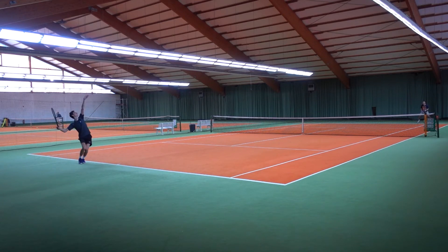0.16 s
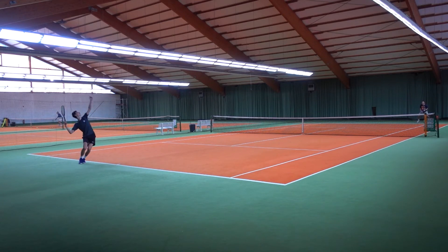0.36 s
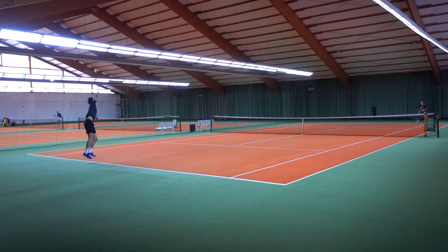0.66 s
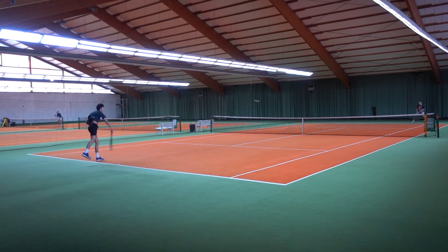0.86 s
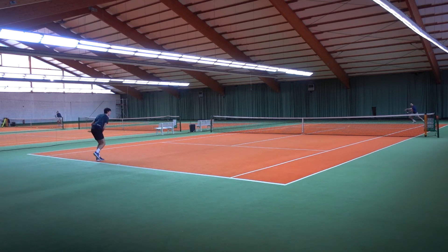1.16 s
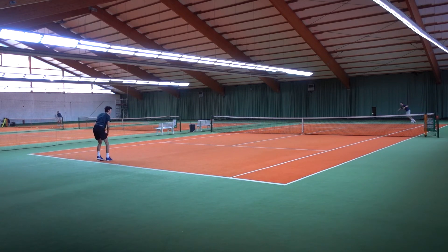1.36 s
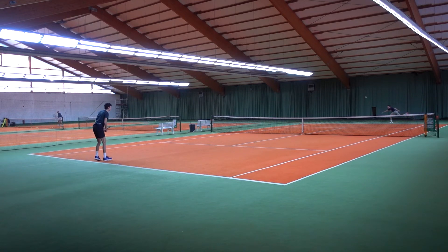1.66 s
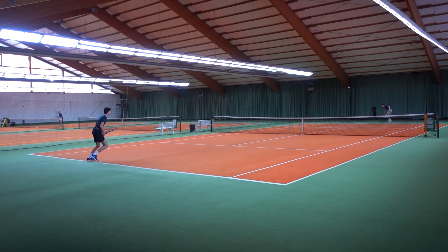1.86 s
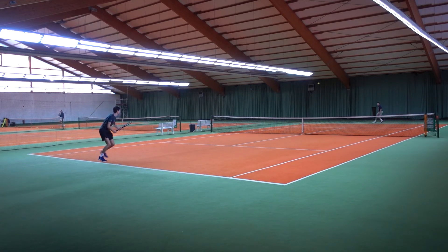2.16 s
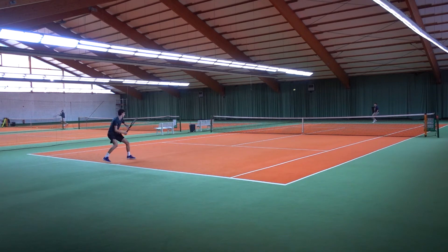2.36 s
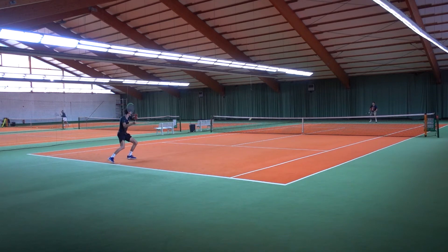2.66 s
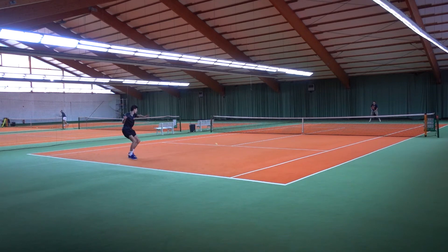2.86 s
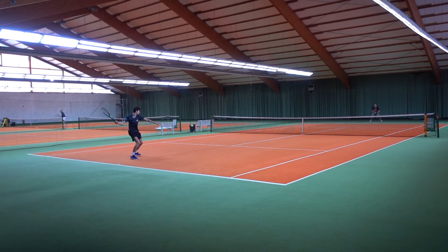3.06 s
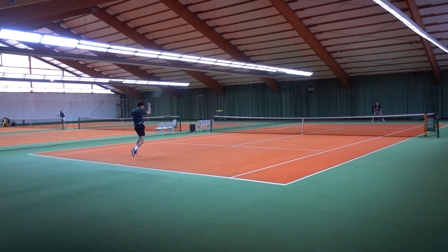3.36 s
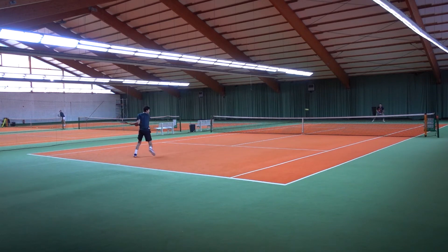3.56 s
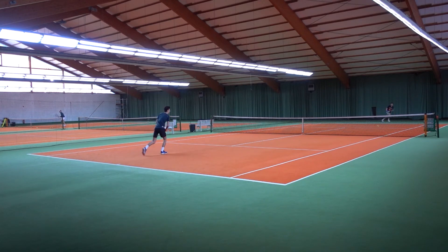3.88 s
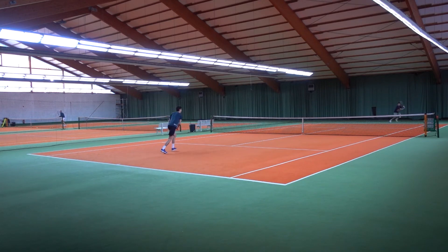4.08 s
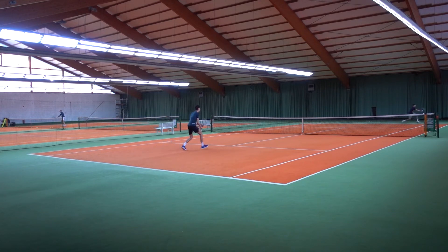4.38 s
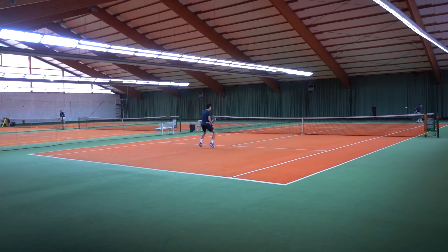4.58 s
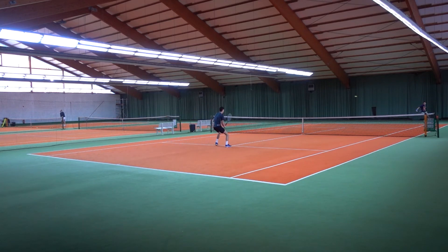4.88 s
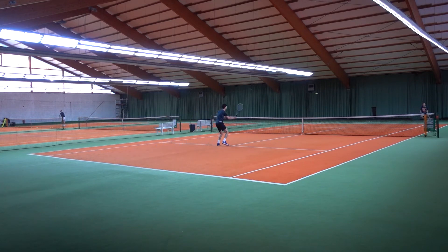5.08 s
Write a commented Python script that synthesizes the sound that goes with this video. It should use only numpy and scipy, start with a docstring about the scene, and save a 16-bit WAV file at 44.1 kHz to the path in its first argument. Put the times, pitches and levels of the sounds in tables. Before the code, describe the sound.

From the corner of an indoor tennis court, five racket hits crack with a hollow pop and a long echo off the roof and walls. The near serve comes first, then two distant smacks close together, another near stroke and a far answer. Footsteps thud, soles scuff and squeak, and the ball knocks on the floor in the gaps, with faint, steady air noise underneath.

```python
"""Indoor tennis rally

Heard from a corner of the court in a large hall. Racket strokes pop, scatter off floor and walls,
swell back from the wooden roof and die away slowly. Shoes and ball thud on the court,
rubber soles scuff and squeak, and the hall keeps up a faint hush."""
import sys
import numpy as np
from scipy import signal
from scipy.fft import rfft, irfft, next_fast_len
from scipy.io import wavfile

SR = 44100
rng = np.random.default_rng(int(sys.argv[2]) if len(sys.argv) > 2 else 0)


def generate_wav(sig):
    """Save sig (samples, or channels by samples) to the path in sys.argv[1] as 16-bit PCM at SR."""
    pcm = np.round(np.clip(np.atleast_2d(sig).T, -1, 1) * 32767).astype(np.int16)
    wavfile.write(sys.argv[1], SR, pcm)


N = 230363
SPAN = 2 * SR  # impulse response length
T = np.arange(SPAN) / SR
FREQS = np.fft.rfftfreq(SPAN, 1 / SR)


def undb(db):
    """Decibels to gain."""
    return 10 ** (np.asarray(db) / 20)


def unit(x):
    """Scale to unit mean energy per channel."""
    return x / np.sqrt(np.mean(np.sum(x ** 2, axis=-1)))


def fade(t60_s):
    """Exponential decay, 60 dB in t60_s."""
    return np.exp(-np.log(1000) * T / t60_s)


def curve(points, f_hz=FREQS):
    """Interpolate (f/Hz, value) points over log frequency."""
    hz, value = np.transpose(points)
    return np.interp(np.log(f_hz + 1), np.log(hz), value)


def resonance(hz, width_hz):
    """Broad band-pass resonance, in dB."""
    f = FREQS + 1
    return -10 * np.log10(1 + ((f * f - hz * hz) / (f * width_hz)) ** 2)


def peak(hz, width_hz, height_db):
    """Narrow peak on a flat spectrum, in dB."""
    return height_db / (1 + (2 * (FREQS - hz) / width_hz) ** 2)


def strike(spectrum_db):
    """Minimum-phase click of unit energy with the given spectral shape."""
    cepstrum = irfft(np.log(undb(spectrum_db)))
    fold = 1 + np.sign(SPAN // 2 - np.arange(SPAN))
    fold[0] = 1
    return unit(irfft(np.exp(rfft(cepstrum * fold)))[:SR // 10])


def thump(hz, swell_s):
    """Soft contact: a few cycles swell and die; the air carries their rate of change."""
    t = T[:SR // 10]
    envelope = (t / swell_s) ** 2 * np.exp(-2 * t / swell_s)
    return unit(np.gradient(envelope * np.sin(2 * np.pi * hz * t)))


def through(x, response):
    """Convolve x with a path's impulse response."""
    return signal.fftconvolve(np.atleast_2d(x), np.atleast_2d(response), axes=-1)


def add(out, t_s, x):
    """Mix x into out from t_s on."""
    start = max(int(t_s * SR), 0)
    out[:, start:start + x.shape[-1]] += x[..., :N - start]


def diffuse(size=SPAN):
    """Noise from all directions: left and right alike in the bass, unrelated in the treble."""
    # stereo width: f/Hz, side over mid/dB
    width = [(60, -6), (190, -26.5), (340, -20), (620, -12.5), (1100, -6.5), (2000, -10.5), (3500, -1),
             (6300, 4), (11000, -3.5)]
    side_gain = undb(curve(width, np.fft.rfftfreq(size, 1 / SR)))
    mid, side = rfft(rng.standard_normal((2, size)))
    left_right = np.array([mid + side_gain * side, mid - side_gain * side])
    return irfft(left_right / np.sqrt(1 + side_gain ** 2), size)


def scatter(build_s, t60_s, patchy_db=1.0):
    """Uneven reflections from the floor and nearby surfaces."""
    size, clump_samples = SR // 3, 49
    clumps = np.repeat(rng.standard_normal(size // clump_samples), clump_samples)
    envelope = ((1 - np.exp(-T / build_s)) * fade(t60_s))[:size]
    return unit(diffuse(size) * envelope * undb(patchy_db * clumps))


def hall(build_s=0.0024, roof_delay_s=0.19, roof_log_spread=0.45):
    """Two responses: the hall's long tail and the broad swell off the sloping roof."""
    # octave bands: f/Hz, t60/s, tail/dB, roof swell/dB
    bands = [(72, 1.7, -21, -6), (140, 2.05, -6, -7.5), (276, 2.1, -5, -16), (513, 2.06, -2.5, -10.5),
             (1100, 1.66, -2, -3), (2000, 1.59, -6.5, -9), (4130, 0.88, -0.5, -13), (7800, 0.58, -1, -20)]
    walls, ceiling = rfft(diffuse()), rfft(diffuse())
    log_time = np.log((T + 1 / SR) / roof_delay_s)
    swell = unit(np.exp(-0.5 * (log_time / roof_log_spread) ** 2))
    build = (1 - np.exp(-T / build_s)) / np.linalg.norm(fade(1.46))
    centres_hz = [band[0] for band in bands]
    tail = roof = 0
    for share, (_, t60_s, tail_db, roof_db) in zip(np.eye(len(bands)), bands):
        octave = curve(np.column_stack([centres_hz, share]))
        tail = tail + irfft(walls * octave) * undb(tail_db) * build * fade(t60_s)
        roof = roof + irfft(ceiling * octave) * undb(roof_db) * swell
    return tail, roof


def in_hall(near, sent, roof_db=-12):
    """Near sound at floor level plus the hall's response to sent."""
    tail, roof = hall()
    return near + through(sent, tail + undb(roof_db) * roof)[:, :N]


def hush(level_db=-56.5):
    """Steady faint air noise of the hall."""
    # spectral shape: f/Hz, level/dB
    spectrum = [(30, -36), (70, -39), (130, -19.5), (250, -9), (380, 3), (550, -8), (1000, -6),
                (2200, -12.5), (3500, -22.5), (6000, -23), (11000, -30)]
    size = next_fast_len(N, real=True) * 2
    gain = undb(curve(spectrum, np.fft.rfftfreq(size, 1 / SR)))
    air = irfft(rfft(diffuse(size)) * gain)[:, :N]
    return undb(level_db) * air / air.std()


def knocks_and_swells():
    """Near ball knocks; dull, blurred swells in the hall, after thuds or from distant bounces."""
    near_hits = [(2.9047, -11, 0.045), (2.915, -13, 0.089)]  # ball skidding close by: t/s, level/dB, t60/s
    swells = [(0.0, -14.5), (0.50, -0.5), (1.225, -5.5), (2.61, -15.5), (3.78, -1), (4.05, -13),
              (4.449, -7.5)]  # dull swells in the hall: t/s, level/dB
    # hollow near knock and dull swell: f/Hz, level/dB
    knock_spectrum = [(60, -30), (160, -8.5), (330, 7.5), (700, -5), (1250, 2.5), (1700, -27), (2800, -15),
                      (4200, -34), (11000, -48)]
    swell_spectrum = [(60, -11), (150, 2.5), (350, 10), (1000, 13), (2200, 3.5), (4000, -8.5), (11000, -67)]
    near, sent = np.zeros((2, N)), np.zeros((1, N))
    knock, dull_click = strike(curve(knock_spectrum)), strike(curve(swell_spectrum))
    for t_s, db, t60_s in near_hits:
        add(near, t_s, undb(db) * through(knock, scatter(0.0008, t60_s)))
    for t_s, db in swells:
        blur = scatter(build_s=0.0056, t60_s=0.16)[0]
        add(sent, t_s, undb(db) * through(dull_click, blur))
    return in_hall(near, sent)


def scuffs(rasp_width_hz=1300, squeak_width_hz=70, dull_hz=3600, hall_db=1.5):
    """Rubber sticks and slips: a grip squeaks low and clear, a slide is higher and mostly rasp."""
    # sole rubs: t/s, level/dB, f/Hz, t60/s
    rubs = [(0.442, -12, 1823, 0.035), (.503, -6.5, 1816, 0.054), (.537, -10.5, 2380, 0.053),
            (1.270, -17.5, 2005, 0.33), (2.316, -7.5, 2081, 0.29), (3.645, -14, 2170, .024),
            (3.675, -16, 2340, 0.042), (4.547, -14, 2460, .12), (5.102, -17.5, 2990, 0.037),
            (5.139, -20.5, 2760, 0.12), (5.201, -14.5, 2840, 0.098)]
    near, sent = np.zeros((2, N)), np.zeros((1, N))
    rolloff_db = 20 * np.log10(1 + (FREQS / dull_hz) ** 2)
    for t_s, db, hz, t60_s in rubs + shuffle():
        squeak_db = max(18 - 14 * np.log2(hz / 1910), 0)  # -14 dB per octave
        spectrum_db = resonance(hz, rasp_width_hz) + peak(hz, squeak_width_hz, squeak_db) - rolloff_db
        rub = undb(db) * strike(spectrum_db)
        add(near, t_s, through(rub, scatter(0.024 * t60_s, t60_s)))  # long slides start softly
        add(sent, t_s, undb(hall_db) * rub)
    return in_hall(near, sent)


def shuffle(rate_per_s=16, centre_hz=2740, spread_octaves=0.12, t60_s=0.12):
    """Quick footwork between shots: scuff rows at uneven times and pitches."""
    # bursts: t/s, length/s, level per rub/dB
    bursts = [(3.781, .12, -20.5), (4.754, .14, -21)]
    rubs = []
    for start_s, length_s, db in bursts:
        for t_s in np.arange(start_s, start_s + length_s, 1 / rate_per_s):
            hz = centre_hz * 2 ** (spread_octaves * rng.standard_normal())
            jitter_s = 0.5 * rng.random() / rate_per_s
            rubs.append((t_s + jitter_s, db, hz, t60_s))
    return rubs


def landings(shoe_below_hz=480, grit_db=-26, floor_db=-8, thud_hall_db=-1, slap_hall_db=4.5):
    """Shoes and ball thud, slap and knock the floor; the deep thuds are shoes and crunch grit."""
    # impacts: t/s, thud/dB, thud f/Hz, slap/dB
    impacts = [ (0.4426, -11.5, 310, -11), (.4900, -18, 390, -14.5), (1.5450, -2, 400, -15),
               (2.2636, -11.5, 258, -5.5), (2.3816, -2, 290, -4), (2.3890, -0.5, 662, -26),
               (3.7127, -5.5, 348, -14), (4.4510, -19.5, 715, -34), (4.4867, -10, 276, -2.5),
               (4.5288, -2, 665, -34), (4.5365, -1.5, 530, -11), (5.1026, -7, 350, -15.5),
               (5.1590, -13.5, 332, -16.5)]
    # sole slap, grit underfoot, dull floor knock: f/Hz, level/dB
    slap_spectrum = [(40, -20), (100, -8.5), (220, -11), (500, 6.5), (1000, 10), (1900, 11), (2700, 5),
                     (4000, -6.5), (7000, -17), (11000, -34)]
    grit_spectrum = [(1000, -52), (2600, -11), (3600, 6.5), (5000, -2), (7000, -4.5), (11000, -21)]
    floor_spectrum = [(40, 4), (100, -30), (190, 3.5), (350, 7.5), (700, -13.5), (1400, -11.5), (4000, -49)]
    near, sent = np.zeros((2, N)), np.zeros((1, N))
    sole, grit, floor = (strike(curve(s)) for s in (slap_spectrum, grit_spectrum, floor_spectrum))
    for t_s, thud_db, hz, slap_db in impacts:
        thud = undb(thud_db) * thump(hz, swell_s=0.0024)
        slap = undb(slap_db) * sole + (hz < shoe_below_hz) * undb(grit_db) * grit
        boom = undb(thud_db + floor_db) * floor
        add(near, t_s, thud)
        add(near, t_s, through(slap, scatter(build_s=0.00068, t60_s=0.041)))
        add(near, t_s, through(boom, scatter(build_s=0.0021, t60_s=0.061)))
        add(sent, t_s, undb(thud_hall_db) * (thud + boom) + undb(slap_hall_db) * slap)
    return in_hall(near, sent)


def swishes(width_hz=1500):
    """Air rushes through the strings, growing until the ball is met."""
    # swings: contact t/s, level/dB, f/Hz, swell/s
    swings = [(0.743, -10.5, 1500, 0.023), (3.352, -19.5, 2240, 0.026)]
    out, size = np.zeros((2, N)), SR // 6
    for contact_s, db, hz, swell_s in swings:
        rush = unit(diffuse(size) * np.exp(-T[:size][::-1] / swell_s))
        add(out, contact_s - size / SR, undb(db) * through(strike(resonance(hz, width_hz)), rush))
    return out


def strokes(crack_db=-10, thump_db=-10.5, snap_db=-2, roof_db=2, body_hall_db=-5):
    """Ball on strings: a crack, a hollow thump and a short ring, direct and reflected."""
    # hits: t/s, level/dB, distance/m, clear path/dB, hall/dB, thump f/Hz, ring/dB
    hits = [ (0.7408, 9, 11.2, 2.5, 4.5, 321, -14), (1.5925, 9.5, 32, -0.5, 7, 470, -17.5),
            (1.8870, 13, 29, -14, -2, 820, -7), (3.352, 7.5, 12.8, 0.5, 2.5, 347, -10.5),
            (4.5754, 6.5, 27, -16, 2, 1080, -9.5)]
    # stroke spectra, set by where the ball meets the strings: f/Hz, level/dB
    serve = [(41, -53), (70, -55), (265, -8), (308, -5.5), (342, -3), (405, 0.5), (523, -1.5), (718, -7),
             (945, -3), (1270, -2), (1540, -10.5), (2070, -1.5), (2720, -13), (5830, -23), (11000, -34.5),
             (14300, -59), (22000, -120)]
    serve_return = [(41, -105), (70, -36), (163, -18), (350, -6), (380, -6.5), (569, -1.5), (765, -7),
                    (868, -6), (1380, -14), (1470, -10.5), (2160, -7), (3740, -20.5), (4430, -25),
                    (9290, -38), (11000, -48), (14300, -90), (22000, -120)]
    smack = [(70, -79), (130, -28), (220, -10.5), (500, -16), (700, -16.5), (815, 9), (930, -17.5),
             (1200, -0.5), (1470, 2.5), (1700, 2), (2900, 1.5), (3600, -11), (6000, -26.5), (11000, -44)]
    forehand = [(70, -42), (130, -27.5), (230, -11), (360, -3), (520, 1.5), (760, -2), (1100, -3.5),
                (1500, -13), (2130, -5), (3000, -15), (4800, -18), (5800, -27), (7300, -27), (11000, -32.5)]
    reply = [(41, -78), (70, -28.5), (357, -2), (470, -4), (512, -11), (906, 2.5), (1170, -3.5),
             (1300, -3.5), (1470, -3), (1670, -11.5), (1860, -5.5), (2300, -8), (2610, -2), (4160, -19.5),
             (11000, -37), (14300, -84), (22000, -120)]
    racket_modes = [(930, 70, 2), (1140, 90, 2), (1477, 40, 5), (1736, 30, 3), (2075, 30, 4), (2140, 30, 3),
                    (2280, 30, 4), (2598, 45, 3), (2943, 40, 7), (3620, 50, 3), (6160, 200, 4),
                    (7125, 200, 4)]  # strings and frame: f/Hz, width/Hz, level/dB
    rings_hz = (2075, 509, 813, 522, 2598)  # main ring per stroke: f/Hz
    snap_spectrum = [(300, -76), (2000, 18), (4000, 8), (5500, 5), (7300, 11.5), (9000, 8.5), (11000, 0)]  # strings snapping over each other: f/Hz, level/dB
    ring_t60_s, direct_lag_s, snap_range_m = 0.18, 0.0026, 18
    build_s_per_m2, t60_s_per_m = 1.3e-5, 0.0096  # farther strokes scatter more slowly
    out = np.zeros((2, N))
    modes_db = sum(peak(*mode) for mode in racket_modes)
    for hit, spectrum, ring_hz in zip(hits, (serve, serve_return, smack, forehand, reply), rings_hz):
        t_s, db, distance_m, clear_db, hall_db, thump_hz, ring_db = hit
        pop = strike(curve(spectrum) + modes_db)
        ring = unit(np.sin(2 * np.pi * ring_hz * T) * fade(ring_t60_s))[:len(pop)]
        body = undb(thump_db) * thump(thump_hz, swell_s=0.0018) + undb(ring_db) * ring
        early = scatter(build_s_per_m2 * distance_m ** 2, t60_s_per_m * distance_m)
        tail, roof = hall()
        # a clear path passes both the direct crack and the roof swell
        direct = undb(crack_db + clear_db) * pop + body
        room = undb(hall_db) * tail + undb(roof_db + clear_db) * roof
        add(out, t_s + direct_lag_s, undb(db) * direct)
        add(out, t_s, undb(db) * through(pop, early))
        add(out, t_s, undb(db) * through(pop + undb(body_hall_db) * body, room))
        if distance_m < snap_range_m:
            snap = undb(snap_db) * strike(curve(snap_spectrum))
            add(out, t_s, through(snap, scatter(build_s=0.00042, t60_s=0.023)))
    return out


def echoes(relative_width=0.44):
    """Hard stroke echoes off roof and end wall, each a narrow-band, smeared click."""
    # arrivals: t/s, level/dB, f/Hz, t60/s
    arrivals = [(0.904, 0, 1230, 0.04), (0.933, -18, 1200, 0.044), (.972, -6, 630, 0.023),
                (1.7250, 5, 680, 0.064), (3.381, -4, 410, 0.028)]
    out = np.zeros((2, N))
    for t_s, db, hz, t60_s in arrivals:
        click = strike(2 * resonance(hz, relative_width * hz))
        add(out, t_s, undb(db) * through(click, scatter(0.0011, t60_s)))
    return out


def scene():
    """The rally and the hall."""
    return strokes() + swishes() + echoes() + landings() + knocks_and_swells() + hush() + scuffs()


def record(dry, low_cut_hz=90, high_cut_hz=11300):
    """The microphones favour the right a little, thin the deep bass and cut the top."""
    # balance: f/Hz, left minus right/dB
    balance = [(300, 0), (1000, -0.2), (2000, -1.5), (4000, -1), (8000, -1.2)]
    size = next_fast_len(N + SR, real=True)
    lean_db = curve(balance, np.fft.rfftfreq(size, 1 / SR))
    leaning = irfft(rfft(dry, size) * undb([lean_db / 2, -lean_db / 2]), size)[:, :N]
    low_cut = signal.butter(2, low_cut_hz, "highpass", fs=SR, output="sos")
    high_cut = signal.ellip(10, 0.2, 70, high_cut_hz, fs=SR, output="sos")
    return signal.sosfilt(high_cut, signal.sosfilt(low_cut, leaning))


dry = scene()
out = record(dry)
generate_wav(out)
```